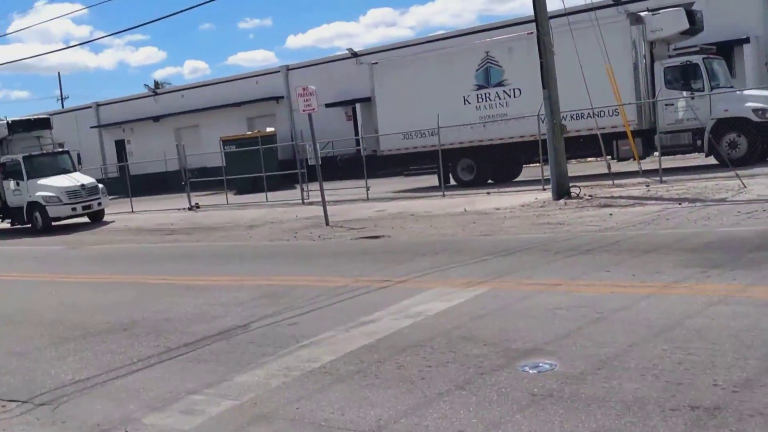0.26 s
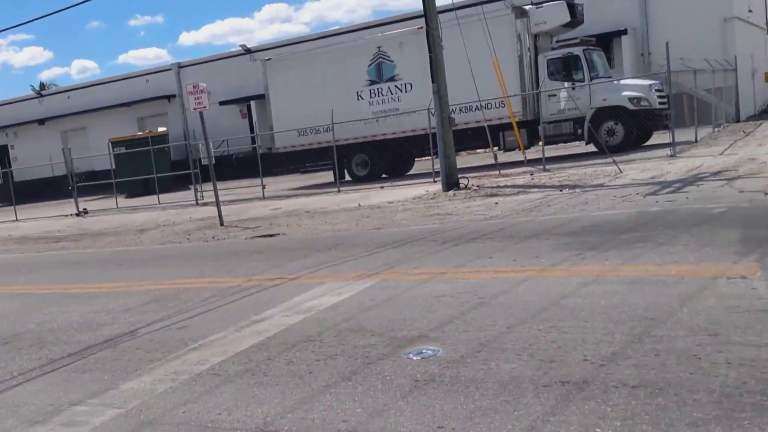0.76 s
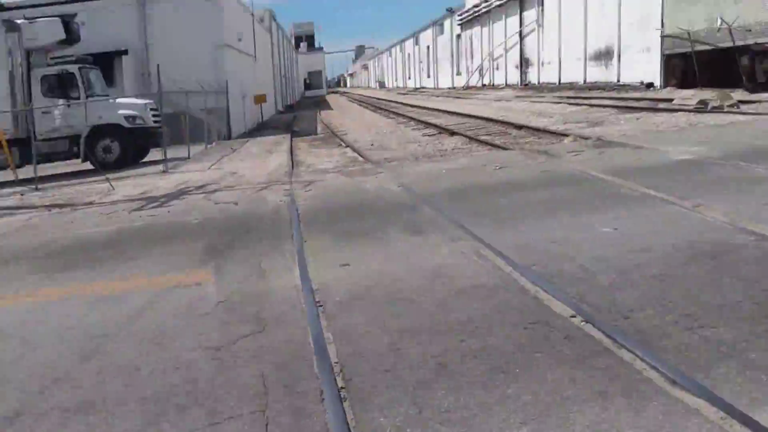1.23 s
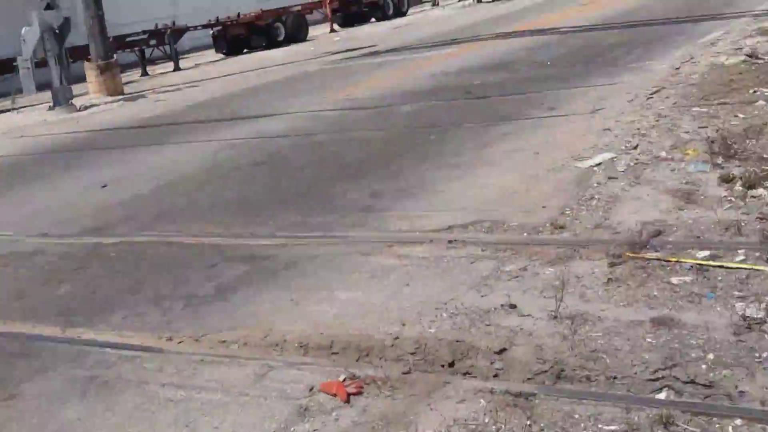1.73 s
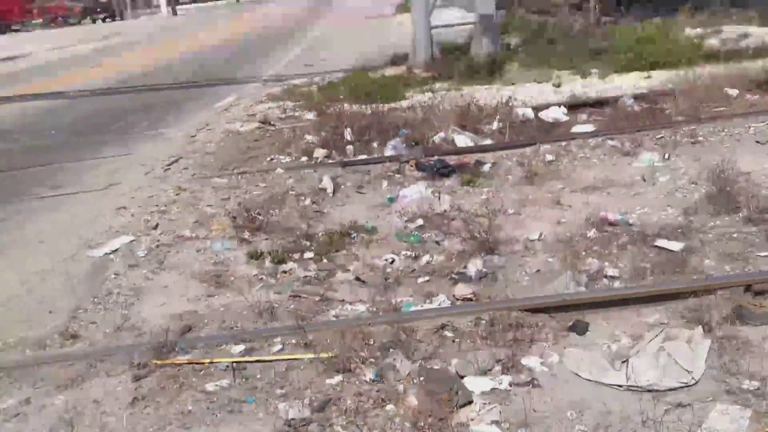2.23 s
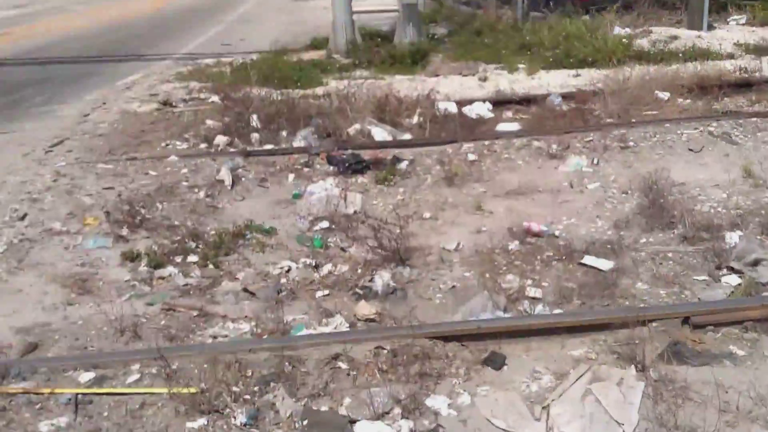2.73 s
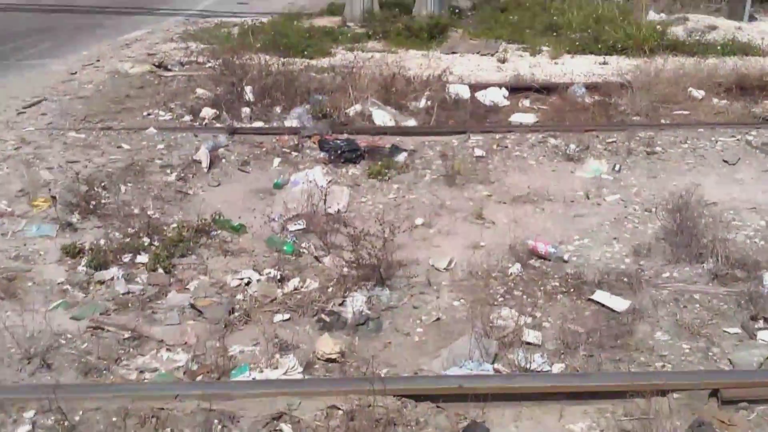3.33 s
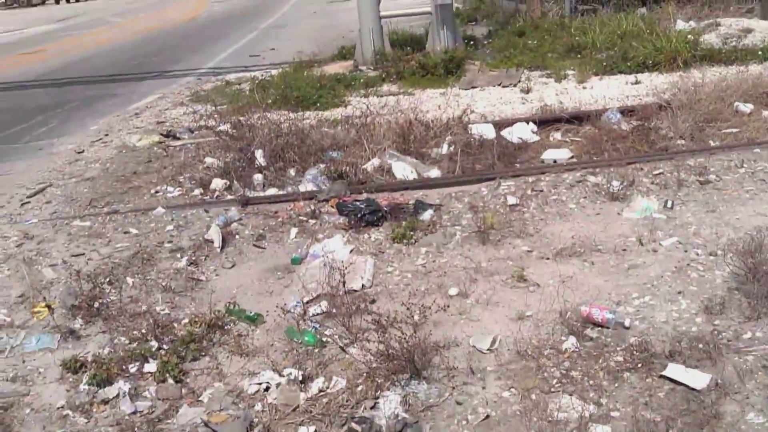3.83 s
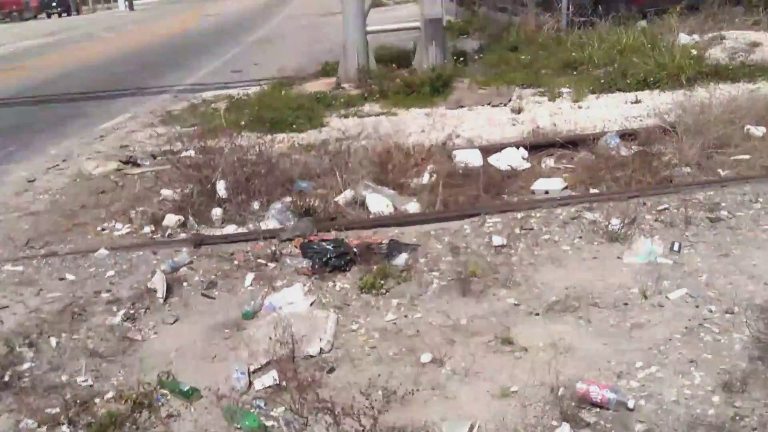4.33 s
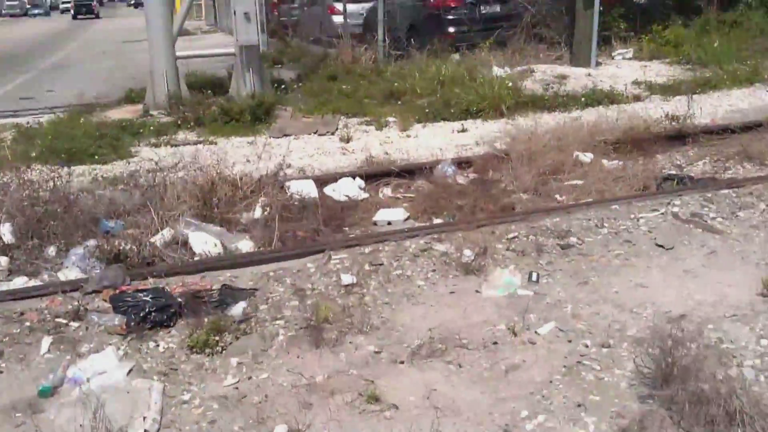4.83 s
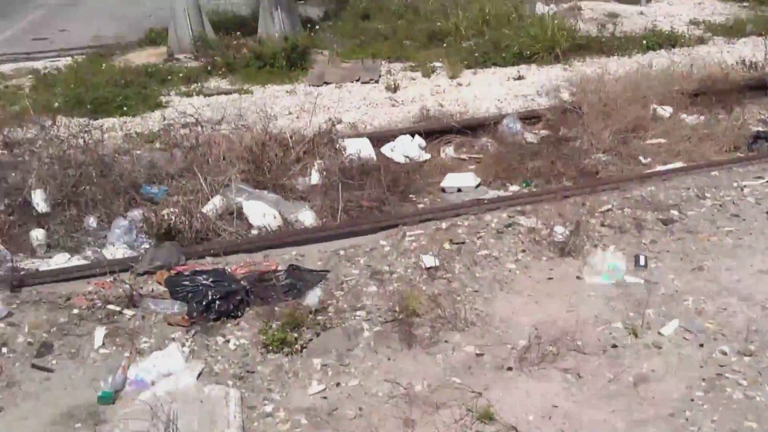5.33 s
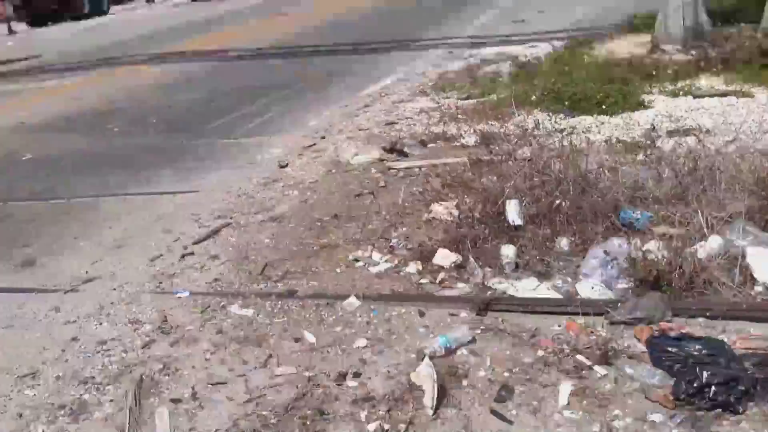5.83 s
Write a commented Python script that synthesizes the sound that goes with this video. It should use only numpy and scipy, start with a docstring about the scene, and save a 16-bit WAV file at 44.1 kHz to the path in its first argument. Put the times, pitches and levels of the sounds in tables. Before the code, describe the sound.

Outdoors beside a street, a steady airy hiss with a faint whistle brightens in surges for under two seconds and ends in a rapid spit. A hard tick close by briefly ducks the sound. Afterwards there is a soft traffic roar with hollow tyre hiss, a weak diesel hum, low buffeting wind on a handheld microphone, a few muffled case bumps, and later crunchy steps on gravel.

```python
"""Air jet by a truck yard

Band-coloured noise makes a jet of air that surges, spits and chatters shut, and the distant traffic.
Drifting sine tones make an idling diesel; damped rings and noise make shoes on gravel and bumps in the hand.
Noise puffs are wind on the two ports of a hand-held microphone.
A sharp click close by trips the limiter: everything dips and swells back over about a second."""
import sys
import numpy as np
from scipy import signal
from scipy.fft import rfft, irfft, next_fast_len
from scipy.io import wavfile
from scipy.ndimage import uniform_filter1d, minimum_filter1d, map_coordinates

SR = 44100
rng = np.random.default_rng(int(sys.argv[2]) if len(sys.argv) > 2 else 0)


def store_wav(level_fs):
    """Save 16-bit WAV to argv[1]."""
    pcm = np.round(np.clip(np.atleast_2d(level_fs), -1, 1) * 32767)
    wavfile.write(sys.argv[1], SR, pcm.T.astype(np.int16))


N = 267554
TIME = np.arange(N) / SR  # s

# Spectrum of the steady jet: (frequency [Hz], level [dB per Hz])
JET_SPECTRUM = [(300, -12), (650, 4.5), (950, -15), (1250, -18.5), (1800, -0.5), (2250, -11), (2700, -2),
                (3120, -46), (3350, 0), (3750, -7.5), (4400, -12), (5250, -4), (5800, -7), (7000, -2),
                (9500, -4), (11000, -6.5), (12900, -6), (14200, -12.5)]
# Left-right likeness of the jet, clipped to -1..1: (frequency [Hz], likeness)
JET_LIKENESS = [(300, 0.15), (1100, 0.66), (1600, -0.15), (2050, -0.93), (2500, -0.84), (2800, -0.37),
                (3050, -1.9), (3200, 1.1), (3750, 0.53), (4000, 0.21), (4250, -0.48), (4750, -1.8),
                (5150, 0.38), (5700, 0.48), (6400, 0.3), (9000, 0.45), (14000, 0.9)]
# Faint whistle added to the jet: (frequency [Hz], width [Hz], level of the added peak against the hiss [dB])
WHISTLE = (9750, 700, 1.5)
# Surges of the jet: (time [s], level [dB], half length [s], centre [Hz], width [Hz])
JET_SURGES = [(0.13, -31, 0.066, 7540, 2600), (0.813, -27.5, 0.15, 7860, 2900),
              (0.84, -30, 0.05, 12600, 2600), (1.228, -32.5, 0.065, 5200, 800),
              (1.274, -28, 0.1, 8850, 6000), (1.53, -26, 0.09, 9550, 2580)]
# Spectrum of the spit as the valve shuts: (frequency [Hz], level [dB per Hz])
SPIT_SPECTRUM = [(1000, -24), (1900, -15), (2500, -7.5), (3600, -3), (4500, -5), (6500, -20), (10000, -6),
                 (14000, -17)]
# Chatter of the closing valve: (time [s], level before damping [dB], ring [Hz])
VALVE_CHATTER = [(1.7283, -19, 3600), (1.731, -11.5, 3870), (1.736, -18, 3500), (1.7427, -21, 3000)]
# Click close to the microphone, before the limiter: (time [s], peak [dB])
CLOSE_CLICK = (2.0124, 1.42)
# Spectrum of the click: (frequency [Hz], level [dB per Hz])
CLICK_SPECTRUM = [(200, 16), (900, 11.5), (1900, 2), (2700, 3), (4500, 1), (7000, -2), (11000, -2),
                  (14000, -12), (16000, -42)]
# Shoe scuffs: (time [s], level [dB], half length [s], grit level [dB])
SHOE_SCUFFS = [(1.859, -35, 0.0058, -4), (1.957, -29, 0.0078, -4), (2.0, -31.5, 0.0076, 2),
               (4.826, -25.5, 0.067, -1), (5.28, -34.5, 0.11, 1), (5.495, -34, 0.076, -2),
               (5.799, -26, 0.024, 1), (5.942, -31.5, 0.012, -18)]
# Spectrum of ground gravel: (frequency [Hz], level [dB per Hz])
GRAVEL_SPECTRUM = [(100, -43), (400, -2), (800, 5), (1200, -0.5), (1900, -2.5), (2600, -9), (3500, -8),
                   (4600, -16), (7000, -16), (14000, -41)]
# Stones snapping under a shoe: (time [s], level before damping [dB], ring [Hz])
STONE_SNAPS = [(3.359, -10, 1130), (3.3687, -9.5, 1030), (4.757, -14, 1210), (4.825, -13, 850),
               (4.8418, -14.5, 3330), (4.8755, -11, 750), (4.900, -4.5, 1020), (5.596, -15, 700),
               (5.785, -16, 900)]
# Spectrum of a stone's crack: (frequency [Hz], level [dB per Hz])
CRACK_SPECTRUM = [(300, 0), (1500, 0), (3300, -4), (6000, -8), (14000, -22)]
# The strongest wind puffs: (time [s], level [dB])
WIND_PUFFS = [(0.138, -18.5), (0.41, -22), (1.884, -20), (1.958, -21), (2.15, -18), (2.541, -13),
              (3.22, -22), (3.379, -15), (3.724, -22), (4.2, -17), (4.62, -18), (4.712, -19), (5.214, -19),
              (5.48, -23), (5.805, -16.5), (5.925, -11.5), (6.026, -19)]
# Wind flutter between the puffs, before its random swings: (time [s], level [dB])
WIND_FLUTTER = [(0, -30), (0.5, -30), (1.1, -36), (1.9, -26), (2.35, -39), (2.8, -43), (3.2, -30.5),
                (4.2, -31), (5.0, -38), (6.07, -42)]
# Spectrum of wind on the ports: (frequency [Hz], level [dB per Hz])
WIND_SPECTRUM = [(25, -22), (42, -4), (58, -1), (90, 3), (140, 6), (220, -7.5), (400, -19), (900, -39),
                 (3000, -77)]
# Dull bumps on the microphone's case: (time [s], level before damping and dulling [dB], ring [Hz])
CASE_BUMPS = [(2.535, -16, 300), (2.697, -19, 350), (6.024, -15, 300)]
# Orders of the idling diesel, before the overall trim: (frequency [Hz], level [dB])
DIESEL_ORDERS = [(140, -62), (215, -43.5), (243, -50), (270, -47), (339, -44), (382, -42), (409, -46),
                 (500, -47.5), (759, -46.5), (1007, -52.5)]
# Trim of the whole idle: (time [s], trim [dB])
DIESEL_TRIM = [(0, 2), (1.6, -2), (2.2, 4), (2.9, 2), (3.5, 3.5), (5.2, 2), (6.07, -2.5)]
# Traffic roar: (time [s], level [dB])
ROAR_LEVEL = [(0, -33), (0.75, -29), (1.25, -27), (1.8, -33.5), (2.25, -28.5), (2.7, -30), (3.3, -27.5),
              (4.4, -29), (5.0, -26), (5.25, -30), (5.85, -28), (6.07, -36)]
# Spectrum of the roar: (frequency [Hz], level [dB per Hz])
ROAR_SPECTRUM = [(25, -14), (60, -1), (120, 2.5), (220, 1), (380, 1), (600, -5.5), (1000, -10), (1400, -13),
                 (1900, -16), (2600, -18.5), (4400, -41), (9000, -56)]
# Far tyre hiss: (time [s], level [dB])
TYRE_LEVEL = [(0, -40.5), (1.8, -34.5), (2.3, -36.5), (3.4, -32), (3.75, -34), (6.07, -34)]
# Spectrum of the tyre hiss: (frequency [Hz], level [dB per Hz])
TYRE_SPECTRUM = [(1000, -63), (2500, -11), (3400, -5), (4400, -4.5), (5100, -4), (6000, -2.5), (7000, -2.5),
                 (8600, -3), (9800, 2), (11200, -5.5), (12800, -7), (14200, -15.5)]
# Left-right likeness, clipped to -1..1: (frequency [Hz], likeness)
# The spaced ports fall out of phase near 2.3 and 4.5 kHz, which sounds hollow.
PORT_LIKENESS = [(50, -0.9), (130, 0.059), (290, 0.17), (640, 0.63), (1150, 0.96), (1500, 0.71),
                 (1850, -0.18), (2120, -1.28), (2400, -1.42), (2700, 0.11), (3100, 0.74), (3500, 0.68),
                 (3900, 0.13), (4330, -0.92), (4680, -0.87), (5050, 0.38), (5800, -0.028), (7000, 0.2),
                 (14000, -0.0086)]
# Depth of the hollow colour: (time [s], factor on the likeness)
HOLLOW_DEPTH = [(0, 1.3), (0.3, 1.3), (0.45, 1.9), (0.7, 1.15), (1.15, 1.15), (1.3, 1.6), (1.55, 1.8),
                (1.8, 1), (2.7, 1.3), (3.4, 0.85), (4.7, 0.95), (5.1, 1.3), (5.4, 1)]
# Band where that depth applies: (low [Hz], high [Hz])
HOLLOW_RANGE = (1900, 5000)
# Stereo lean: (frequency [Hz], left minus right [dB])
STEREO_LEAN = [(100, 2.5), (250, -6), (400, -4), (800, -2), (1200, 0.8), (2000, 0), (4900, 0), (5400, -1),
               (8500, 0.8), (13000, -1.2)]

JET_DB, JET_SHUT_S = -27.5, 1.749  # steady hiss; moment the jet is silent
SPIT_DB, SPIT_S = -24, 0.021  # level and length of the spit
CHATTER_T60 = 0.0066  # s
KNOCK_RISE_S = 0.00075  # onset of every damped ring
STONE_T60 = 0.0064  # s
CRACK_DB, CRACK_T60 = -17.5, 0.0071  # crack against the stone's level; length in s
GRIT_HZ = 1900  # above this a scuff is grit
PUFF_S = 0.023  # length of a puff
EDDY_DB, EDDIES_PER_S = 2, 14  # depth and pace of the flutter's swings
BUMP_T60, BUMP_TOP_HZ = 0.016, 900  # length in s; how dull a bump is
FADE_DB, PHASE_DRIFT_RAD = 2.6, 1.3  # unsteadiness of each engine order
TREBLE_HZ, TREBLE_LAG_S = 5160, 0.0004487  # above this the hiss is late and inverted on the right
SWAY, SWAYS_PER_S = 0.018, 14  # share and pace of the hollows' flutter in pitch
HOLLOW_WAVER = 0.1  # share by which the hollow depth wavers
CEILING_DB, HOLD_S, RELEASE_DB_PER_S = -4.4, 0.22, 5.5  # limiter
TOP_HZ = 14320  # band limit


def air_jet():
    """Compressed air hisses with a faint whistle; surges brighten their own bands; the valve spits shut."""
    whistle_hz, width, boost_db = WHISTLE
    flow = rush(JET_SPECTRUM, depth_db=3.0, alike=JET_LIKENESS)
    flow = filtered(flow, lambda hz: 1 + amp(boost_db) / (1 + (2 * (hz - whistle_hz) / width) ** 2))
    hiss = amp(JET_DB) * unit(flow)
    eddies = rush([(3000, -17), (5000, -11)], depth_db=2.0, alike=JET_LIKENESS)
    for s, level_db, half, centre, band in JET_SURGES:
        bright = filtered(eddies, lambda hz: np.exp(-2 * ((hz - centre) / band) ** 2))
        hiss = hiss + amp(level_db) * swell(s, half) * unit(bright)
    valve = np.clip((JET_SHUT_S - TIME) / 0.01, 0, 1)  # closes over 10 ms
    closing = np.clip((TIME - JET_SHUT_S + SPIT_S) / 0.001, 0, 1) * valve
    sputter = noise() * amp(1.9 * wobble(600))
    spit = unit(heard(sputter, SPIT_SPECTRUM, alike=[(100, -0.44)]))
    chatter = sum(knock(s, db, hz, CHATTER_T60) for s, db, hz in VALVE_CHATTER)
    unsteady = amp(0.61 * wobble(19.8))
    return unsteady * valve * hiss + amp(SPIT_DB) * closing * spit + chatter


def click():
    """A single coloured impulse: one dry, very loud tick, stronger in the left port."""
    s, db = CLOSE_CLICK
    blow = np.arange(N) == round(s * SR)
    tick = heard(np.array([blow, blow], float), CLICK_SPECTRUM, alike=[(100, 0.27)])
    return amp(db) * tick / np.abs(tick).max()


def shoes():
    """Soles grind dense grains, some scuffs duller; single stones crack and ring for a few cycles."""
    grains = unit(heard(noise() * amp(2.8 * wobble(500)), GRAVEL_SPECTRUM))
    body = filtered(grains, lambda hz: 1 / (1 + (hz / GRIT_HZ) ** 4))
    grit = grains - body
    grind = sum(amp(db) * swell(s, half) * (body + amp(grit_db) * grit)
                for s, db, half, grit_db in SHOE_SCUFFS)
    snaps = sum(amp(db + CRACK_DB) * dying(s, CRACK_T60) for s, db, hz in STONE_SNAPS)
    cracks = unit(heard(noise(), CRACK_SPECTRUM)) * snaps
    rings = sum(knock(s, db, hz, STONE_T60) for s, db, hz in STONE_SNAPS)
    # the rings are mono, so they take only the mid gain
    return grind + cracks + filtered(rings, lambda hz: blend(PORT_LIKENESS, hz)[0])


def wind():
    """Short puffs over a weak, eddying flutter push the two ports in nearly opposite directions."""
    flutter = amp(curve(WIND_FLUTTER) + EDDY_DB * np.tanh(wobble(EDDIES_PER_S)))
    puffs = sum(amp(db) * swell(s, PUFF_S / 2) for s, db in WIND_PUFFS)
    air = unit(heard(noise(), WIND_SPECTRUM, alike=[(100, -0.97)]))
    # each puff is one eddy of fairly even strength
    power = uniform_filter1d(np.mean(air ** 2, axis=0), size=1100)
    strength = np.sqrt(np.abs(power) + 1e-6)
    return air * (flutter + puffs / strength)


def handling():
    """The hand bumps the microphone's case: short damped rings with their highs rolled off."""
    bumps = sum(knock(s, db, hz, BUMP_T60) for s, db, hz in CASE_BUMPS)
    return filtered(bumps, lambda hz: 1 / (1 + (hz / BUMP_TOP_HZ) ** 4))


def diesel():
    """Engine orders drift together in pitch and fade separately on their way over the road."""
    clock = np.cumsum(1 + 0.005 * wobble(3)) / SR
    hum = 0
    for hz, db in DIESEL_ORDERS:
        level = amp(db + FADE_DB * wobble(6))
        hum = hum + level * np.sin(2 * np.pi * hz * clock + PHASE_DRIFT_RAD * wobble(17))
    return amp(curve(DIESEL_TRIM)) * hum


def traffic():
    """Coloured noise: the roar of distant vehicles with a smoother tyre hiss above it."""
    roar = amp(curve(ROAR_LEVEL) + 0.5 * wobble(8)) * rush(ROAR_SPECTRUM, depth_db=1.8)
    tyres = amp(curve(TYRE_LEVEL) + 0.079 * wobble(21)) * rush(TYRE_SPECTRUM, depth_db=2.13)
    return roar + tyres


def rush(spectrum, depth_db, alike=PORT_LIKENESS):
    """Stereo noise whose gain drifts in patches and whose hollows wander with the microphone."""
    hz, t, z = signal.stft(noise(), SR, nperseg=1024)
    patches = rng.standard_normal(z.shape[1:])
    patches = uniform_filter1d(uniform_filter1d(patches, size=7, axis=0), size=8, axis=1)
    # the hollows flutter in pitch as the microphone shakes
    sway = np.exp(SWAY * np.interp(t, TIME, wobble(SWAYS_PER_S)))
    hollow = curve(HOLLOW_DEPTH) * np.exp(HOLLOW_WAVER * wobble(SWAYS_PER_S))
    hollow = np.interp(t, TIME, hollow)
    inside = (hz > HOLLOW_RANGE[0]) & (hz < HOLLOW_RANGE[1])
    depth = np.where(inside[:, None], hollow, 1)
    z = z * amp(depth_db * unit(patches)) * blend(alike, hz[:, None] * sway, depth)
    drifting = signal.istft(z, nperseg=1024)[1][:, :N]
    mid, side = filtered(drifting, lambda f: amp(along(spectrum, f)))
    return unit(np.array([mid + side, mid - side]))


def heard(pair, spectrum, alike=PORT_LIKENESS):
    """Colour two signals and blend them as mid and side into left and right."""
    mid, side = filtered(pair, lambda hz: amp(along(spectrum, hz)) * blend(alike, hz))
    return np.array([mid + side, mid - side])


def blend(alike, hz, depth=1):
    """Mid and side gains that give the ports this likeness; more depth makes hollows deeper and wider."""
    turn = np.arccos(np.clip(along(alike, hz) * depth, -1, 1)) / 2
    return np.array([np.cos(turn), np.sin(turn)])


def lag_right(x):
    """The treble reaches the right port a little after the left, and inverted."""
    def response(hz):
        half_turn = np.pi * (hz * TREBLE_LAG_S - 0.5) * (hz > TREBLE_HZ)
        return np.exp(1j * half_turn * np.array([[1], [-1]]))  # half of the shift on each side
    return filtered(x, response)


def knock(s, db, hz, t60):
    """One short, damped ring struck at time s."""
    rise = np.clip((TIME - s) / KNOCK_RISE_S, 0, 1)
    return amp(db) * rise * dying(s, t60) * np.sin(2 * np.pi * hz * (TIME - s))


def dying(s, t60):
    """An envelope that starts at time s and falls 60 dB in t60 seconds."""
    return (TIME >= s) * amp(-60 * np.clip((TIME - s) / t60, 0, 3))


def swell(s, half):
    """A bell-shaped rise and fall around time s."""
    return np.exp(-0.5 * np.minimum(((TIME - s) / half) ** 2, 100))


def wobble(rate):
    """A smooth random curve, rate knots a second."""
    coarse = TIME[::16]
    knots = rng.standard_normal(int(N * rate / SR) + 4)
    return np.interp(TIME, coarse, map_coordinates(knots, [coarse * rate]))


def noise():
    """Two unrelated white noises."""
    return rng.standard_normal((2, N))


def filtered(x, response):
    """Shape x by a response of frequency."""
    m = next_fast_len(N + SR // 2)
    return irfft(rfft(x, m) * response(np.fft.rfftfreq(m, 1 / SR)), m)[..., :N]


def along(points, hz):
    """Read (frequency [Hz], value) points on a log axis."""
    f, v = np.transpose(points)
    return np.interp(np.log(hz + 1), np.log(f + 1), v)


def curve(rows):
    """Read (time [s], value) rows as one value per sample."""
    return np.interp(TIME, *np.transpose(rows))


def amp(db):
    """Decibels to gain."""
    return 10 ** (np.asarray(db) / 20)


def unit(x):
    """Scale to rms 1."""
    return x / np.sqrt(np.mean(x ** 2) + 1e-20)


def limiter(x):
    """A peak over the ceiling cuts the gain at once; it holds, then climbs back at a steady rate."""
    needed_db = np.minimum(0, CEILING_DB - 20 * np.log10(np.abs(x).max(axis=0) + 1e-9))
    half = int(HOLD_S * SR / 2)
    held_db = minimum_filter1d(needed_db, size=2 * half + 1, origin=half)  # looks back only
    climb_db = RELEASE_DB_PER_S * TIME
    gain_db = np.minimum.accumulate(held_db - climb_db) + climb_db
    return x * amp(gain_db)


def scene():
    """Mix all sources; the stereo lean tilts the airborne ones, their low mids to the right."""
    air = lag_right(traffic() + air_jet()) + diesel() + shoes()

    def lean(hz):
        half_db = along(STEREO_LEAN, hz) / 2
        return amp(np.array([half_db, -half_db]))
    return filtered(air, lean) + wind() + handling() + click()


def record(dry):
    """Limit the peaks, then keep nothing above the band limit."""
    return filtered(limiter(dry), lambda hz: hz < TOP_HZ)


dry = scene()
out = record(dry)
store_wav(out)
```